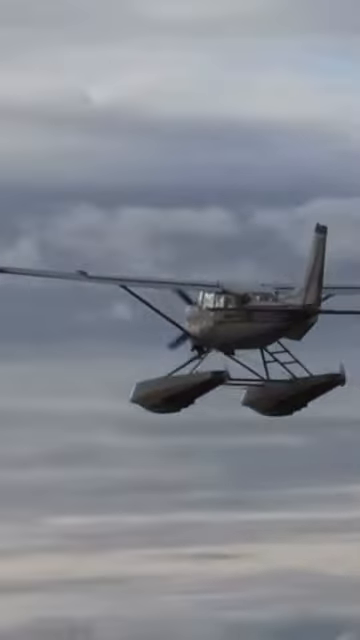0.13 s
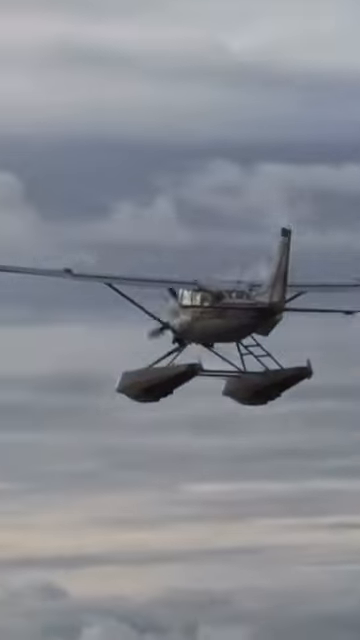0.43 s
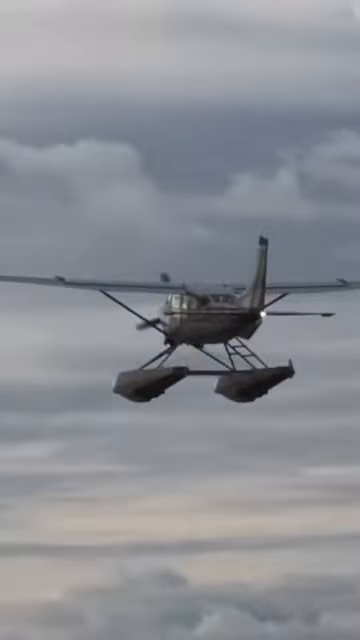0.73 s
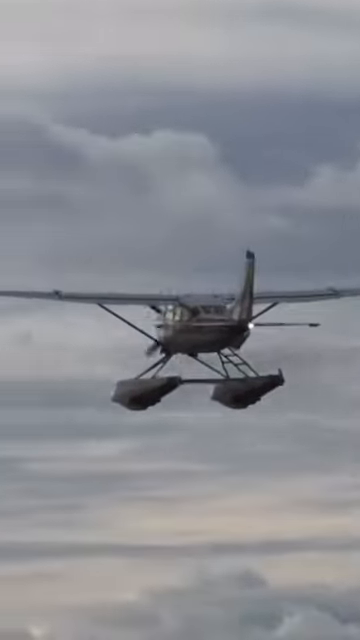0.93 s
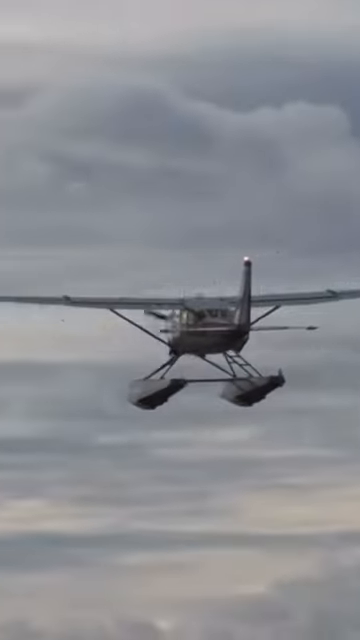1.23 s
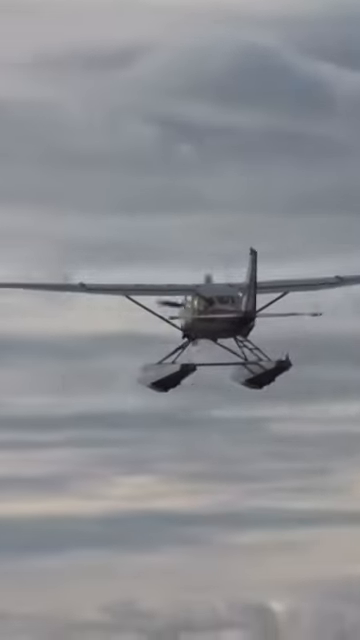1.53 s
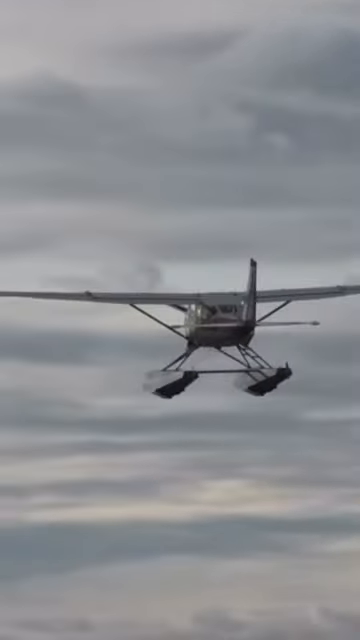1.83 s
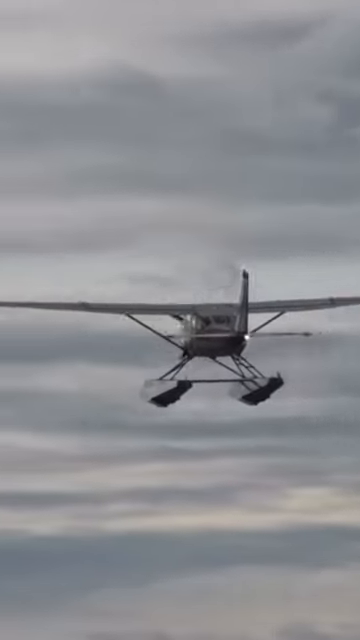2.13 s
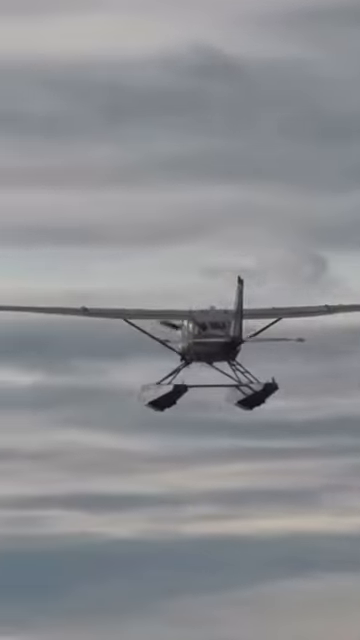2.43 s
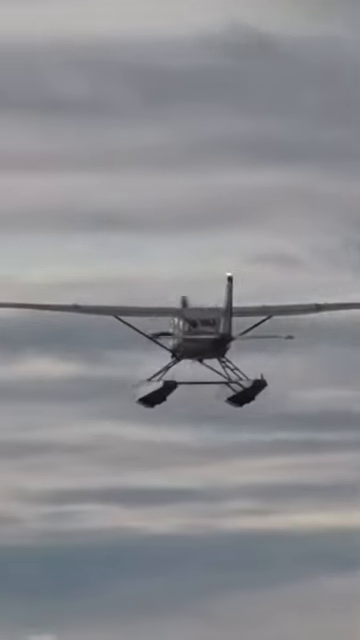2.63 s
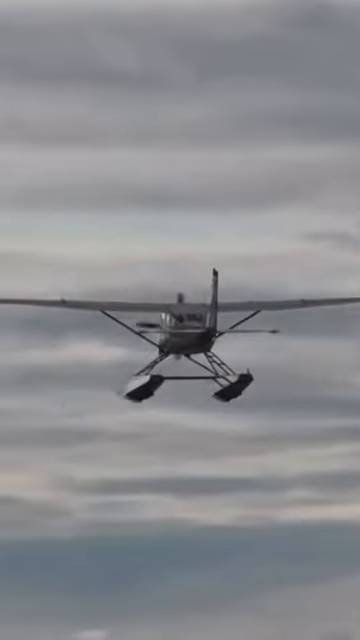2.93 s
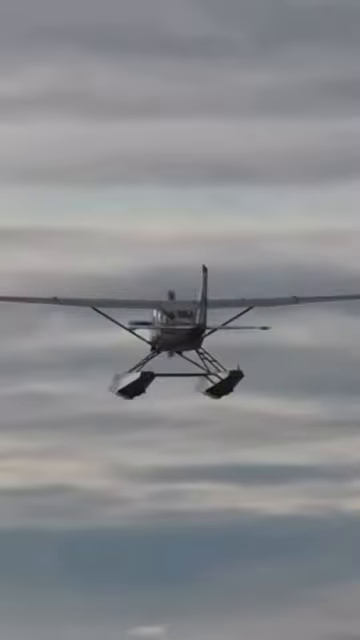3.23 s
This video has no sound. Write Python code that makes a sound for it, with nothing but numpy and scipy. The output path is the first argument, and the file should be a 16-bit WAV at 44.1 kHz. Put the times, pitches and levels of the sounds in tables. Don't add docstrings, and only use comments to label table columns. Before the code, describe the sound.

A single-engine float plane starts loud and close, raspy exhaust buzz over a low drone and propeller wash, then quickly fades and dulls as it flies away in open air, heard by one fixed microphone.

```python
import sys
import numpy as np
from scipy import signal
from scipy.fft import rfft, irfft, next_fast_len
from scipy.io import wavfile
from scipy.ndimage import uniform_filter1d, map_coordinates

SR = 44100
rng = np.random.default_rng(int(sys.argv[2]) if len(sys.argv) > 2 else 0)


def transcribe(u):
    v = np.clip(np.atleast_2d(u).T, -1, 1)
    q = np.round(v * 32767).astype(np.int16)
    wavfile.write(sys.argv[1], SR, q)


def to_linear_factor(level_db):
    exponent = np.asarray(level_db, float) / 20
    return 10 ** exponent


N = 149058


def unit(x):
    return x / np.sqrt(np.mean(x ** 2) + 1e-20)


def along(points, hz):
    f, v = np.transpose(points)
    return np.interp(np.log(hz + 1), np.log(f + 1), v)


def curve(rows):
    return np.interp(np.arange(N) / SR, *np.transpose(rows))


def wobble(rate):
    return map_coordinates(rng.standard_normal(200), [np.arange(N) * rate / SR])


def coloured(db_of_hz):
    size = next_fast_len(N + 8192)
    spectrum = rfft(rng.standard_normal(size))
    gain = to_linear_factor(db_of_hz(np.fft.rfftfreq(size, 1 / SR)))
    return unit(irfft(spectrum * gain, size)[:N])


def patchy(x, depth_db):
    z = signal.stft(x, nperseg=512)[2]
    field = uniform_filter1d(rng.standard_normal(z.shape), size=5, axis=0)
    field = uniform_filter1d(field, size=10, axis=1)
    return signal.istft(z * to_linear_factor(depth_db * unit(field)), nperseg=512)[1][:N]


def cycles():
    # time in seconds, rate in Hz.
    firing = [(0, 129.0), (.45, 128.6), (.85, 128.2), (1.15, 127.78), (1.45, 127.48), (2.3, 127.44),
              (3.38, 127.25)]
    first_burst_s = .0085
    firings = np.cumsum(curve(firing)) / SR - first_burst_s * firing[0][1]
    return firings / 6


def drone():
    # multiple of the engine cycle, level in dB.
    orders = [(3, -19), (6, 1), (9, -20), (12, -14), (15, -18), (17, -21.5), (18, -13), (21, -7.5),
              (22, -14.5), (24, -8.5), (25, -16), (27, -10.5), (28, -18.5), (30, -11), (31, -19.5),
              (33, -21), (36, -22), (42, -18.5), (54, -19.5)]
    drone_db, waver_db, fade_db_per_s = -21.5, 1.3, 0.77
    turns, out = cycles(), 0
    seconds = np.arange(N) / SR
    blur = .005 + .009 * seconds
    for k, db in orders:
        start = rng.random() if k % 3 else .5 * (k > 10)
        level_db = drone_db + db + waver_db * (k > 6.5) * wobble(5) + .8 * wobble(3)
        level_db = level_db - fade_db_per_s * (k > 16) * seconds
        phase = 2 * np.pi * (k * turns + start) + blur * k * wobble(8)
        out = out + np.sqrt(2) * to_linear_factor(level_db) * np.cos(phase)
    return out


def throb():
    # time in seconds, frequency in Hz.
    pitch = [(0, 107.45), (1, 106.95), (2, 105.9), (3.38, 104.75)]
    throb_db, octave_db = -30, -12.5
    phase = 2 * np.pi * np.cumsum(curve(pitch)) / SR
    level = np.sqrt(2) * to_linear_factor(throb_db + 1.4 * wobble(3))
    octave = to_linear_factor(octave_db + 2.9 * wobble(8.2)) * np.sin(2 * phase)
    return level * (octave - np.cos(phase))


def boom():
    # frequency in Hz, density in dB per Hz.
    roar_bands = [(126, -60), (131, 0), (138, -1), (149, -14), (246, -40), (260, -12), (285, -17),
                  (330, -36)]
    boom_db = -29
    spectrum = [(100, -120)] + roar_bands + [(400, -120)]
    return to_linear_factor(boom_db) * coloured(lambda hz: along(spectrum, hz))


def rasp():
    # frequency in Hz, density in dB per Hz.
    jet_spectrum = [(400, -18.5), (1300, 2), (3600, -1.5), (7200, -22.5), (8300, -34), (10300, -39.5),
                    (11500, -52), (15000, -68.5)]
    # centre in Hz, width in Hz, lift in dB.
    pipes = [(2500, 100, 1), (3330, 1200, 2.5)]
    # time in seconds, level in dB.
    bite = [(0, 0), (.6, 0), (1.15, -1), (1.5, -5), (2.1, -7), (3.38, -12)]
    rasp_db, rise_s, fall_s = -22.5, .004, .0015
    scatter_db, far_bank_db, alternate_db = 1.5, -14, .9

    k = (6 * cycles() + 12).astype(int)
    scatter = scatter_db * np.clip(rng.standard_normal(600), -2, 1.5)[k]
    bank_db = np.where(k % 2, far_bank_db, alternate_db * (k % 4 - 1))
    kicks = np.diff(k, prepend=k[0]) * to_linear_factor(scatter + bank_db)
    t = np.arange(800) / SR
    burst = np.exp(-t / fall_s) * (1 - np.exp(-t / rise_s)) ** 2
    gate = signal.fftconvolve(kicks, burst)[:N]

    def jet_db(hz):
        lift = sum(db / (1 + (2 * (hz - centre) / width) ** 2) for centre, width, db in pipes)
        return along(jet_spectrum, hz) + lift

    jet = unit(gate * coloured(jet_db))
    return to_linear_factor(rasp_db + curve(bite)) * jet


def wash():
    # frequency in Hz, density in dB per Hz.
    wash_spectrum = [(50, -20.5), (70, -9.5), (220, -10.5), (480, -0.5), (900, -10.5), (3500, -12.5),
                     (7200, -31.5), (10700, -62.5), (15000, -61)]
    wash_db = -22.5
    roar = coloured(lambda hz: along([(30, -69.5)] + wash_spectrum, hz))
    return to_linear_factor(wash_db) * patchy(roar, depth_db=1.02)


def airframe(x):
    # time in seconds, delay in ms, gain.
    wing = [(0, .88, .35), (.3, .79, .5), (.55, .72, .2), (.8, .62, .0), (3.38, .5, .0)]
    floats = [(0, 1.6, .3), (.3, 1.45, .2), (.6, 1.1, .1), (.9, .87, .35), (1.3, .76, .35), (1.8, .69, .2),
              (3.38, .6, .05)]
    echo_band = [1900, 4600]
    band = signal.butter(3, echo_band, "band", fs=SR, output="sos")
    out, dull = x, signal.sosfiltfilt(band, x)
    for rows in wing, floats:
        s, ms, gain = np.transpose(rows)
        late = np.arange(N) - curve(np.c_[s, ms]) * SR / 1000
        echo = map_coordinates(dull, [late], order=3, mode="mirror")
        out = out + curve(np.c_[s, gain]) * echo
    return out


def away(x):
    # time in seconds, level in dB.
    arrives = [(0, -19), (.3, -22), (.6, -22), (.85, -28.5), (1.1, -32), (1.4, -33.5), (1.9, -37),
               (2.6, -42), (3.38, -40.5)]
    # frequency in Hz, share.
    fades = [(60, 0.32), (128, 0.31), (200, 0.19), (300, 0.63), (600, 0.65), (1000, 0.38), (1500, 0.67),
             (3000, 0.86), (8000, 0.71)]
    # time in seconds, treble in dB.
    turn = [(0, 4), (.35, 5.5), (.6, 0.5), (.9, 7.5), (1.15, 6), (1.4, -0.5), (2.2, -1), (3.38, -6)]
    # frequency in Hz, share.
    turn_acts = [(3500, 0), (6500, 1)]
    hz, t, z = signal.stft(np.pad(x, 2048, "reflect"), SR, nperseg=2048, noverlap=1536)
    t = t - 2048 / SR
    distance_db = np.interp(t, *np.transpose(arrives)) - arrives[0][1]
    fade_db = along(fades, hz)[:, None] * distance_db
    turn_db = along(turn_acts, hz)[:, None] * np.interp(t, *np.transpose(turn))
    return signal.istft(z * to_linear_factor(fade_db + turn_db), SR, nperseg=2048, noverlap=1536)[1][2048:][:N]


def scene():
    tones = drone() + throb() + boom()
    roar = patchy(rasp(), depth_db=1.4) + wash()
    return np.tile(away(tones + airframe(roar)), (2, 1))


def band_limit(x):
    return signal.sosfilt(signal.butter(12, 15150, fs=SR, output="sos"), x)


def record(dry):
    offset = [
        [-.0064],
        [-.0039],
    ]
    hiss = to_linear_factor(-81) * coloured(lambda hz: np.where(hz < 15150, 0, -80))
    return band_limit(dry + hiss + np.array(offset))


dry = scene()
out = record(dry)
transcribe(out)
```